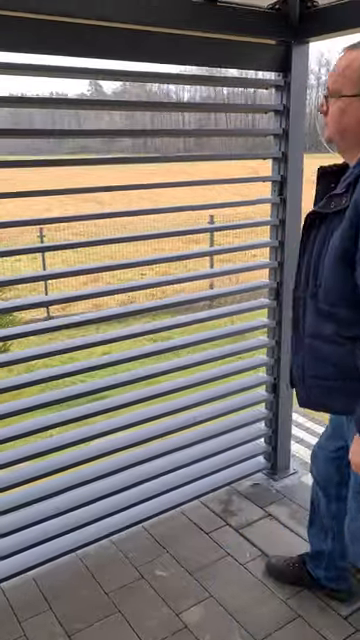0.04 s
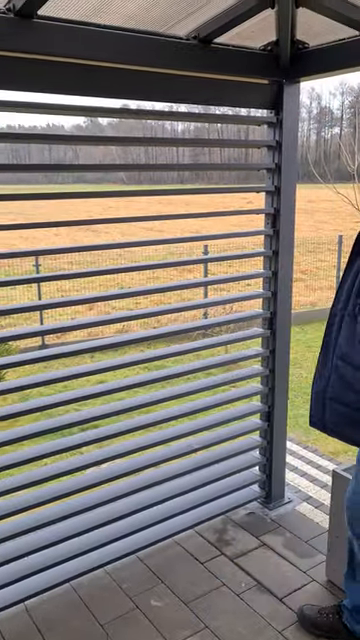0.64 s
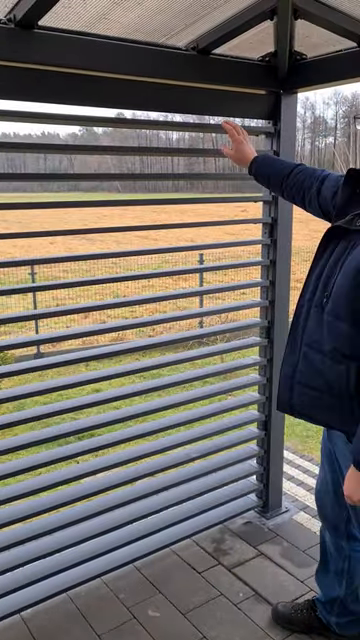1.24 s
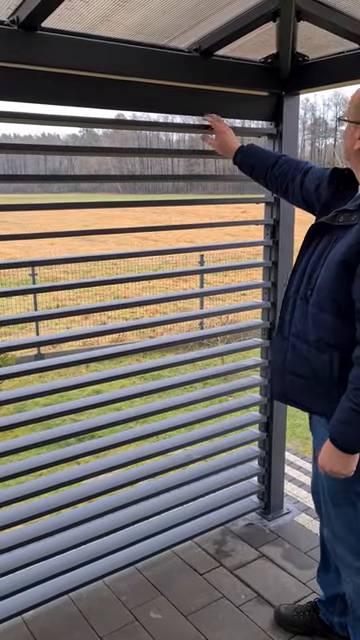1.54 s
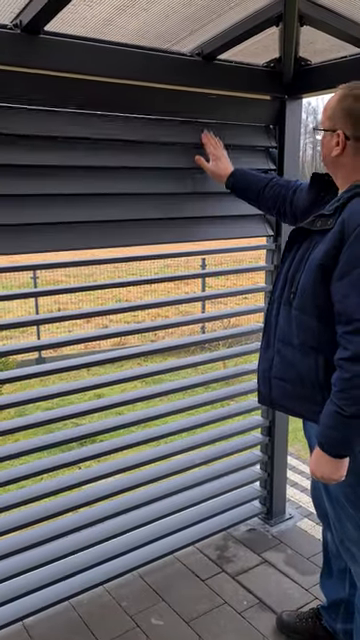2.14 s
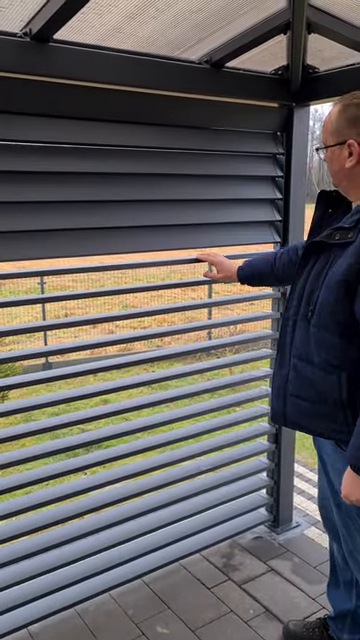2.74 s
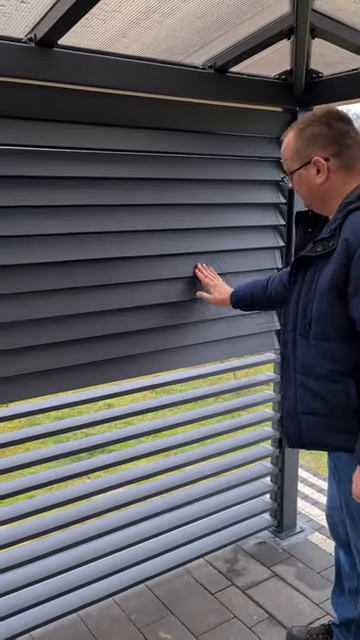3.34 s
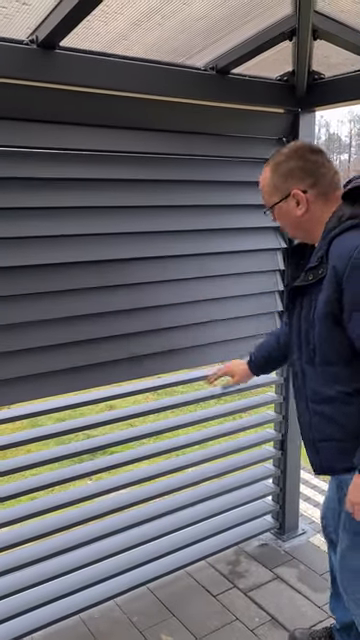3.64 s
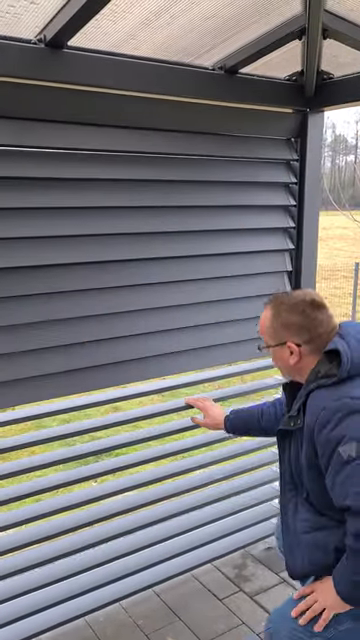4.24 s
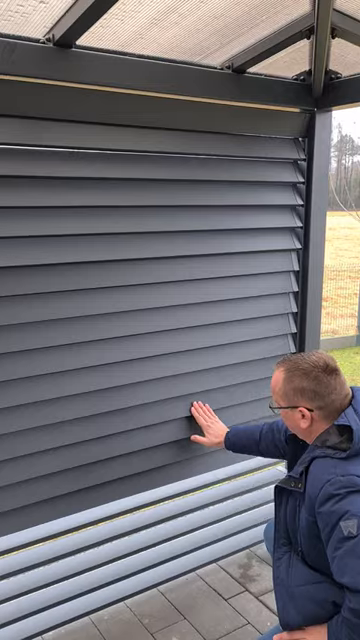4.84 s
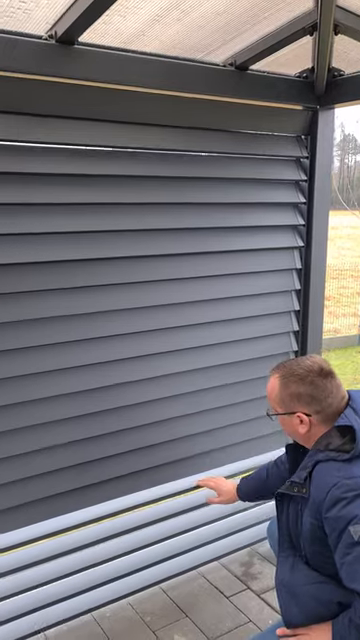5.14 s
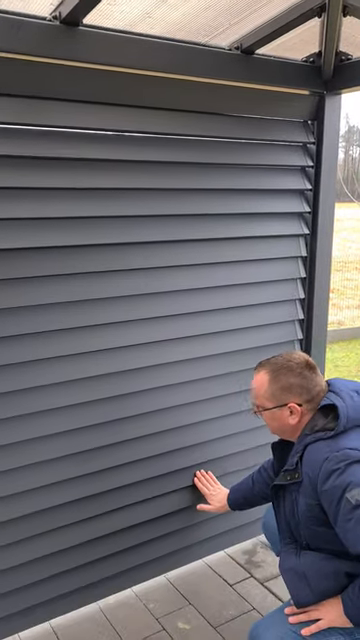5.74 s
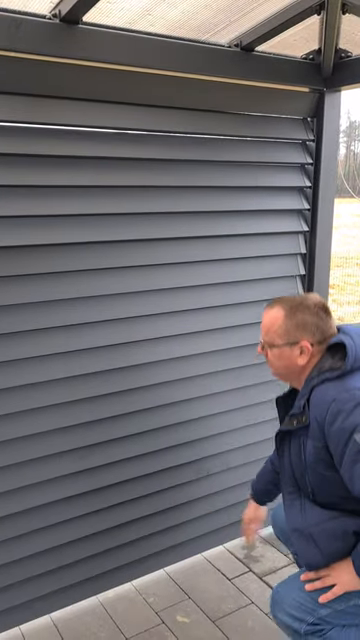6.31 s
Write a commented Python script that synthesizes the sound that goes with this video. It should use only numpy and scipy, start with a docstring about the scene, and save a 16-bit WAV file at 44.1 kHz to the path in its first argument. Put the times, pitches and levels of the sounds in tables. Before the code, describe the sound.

A metal louvre wall is tilted shut by hand, its slats knocking and clattering irregularly over a faint breeze.

```python
"""Shutting a louvre wall

On a breezy garden terrace a man in a padded jacket steps up and tilts metal slats shut, bank by bank.
The linked hollow slats land almost together, bounce, ring in damped modes and set the frame shuddering.
Around the blows come shoes on paving, the friction of sleeve and hand, and small metallic clicks."""
import sys
import numpy as np
from scipy import signal
from scipy.fft import rfft, irfft, next_fast_len
from scipy.io import wavfile
from scipy.ndimage import map_coordinates

SR = 44100
rng = np.random.default_rng(int(sys.argv[2]) if len(sys.argv) > 2 else 0)


def generate_wav(signal):
    """Clip the signal to [-1, 1] and save it as 16-bit WAV at the path in sys.argv[1]."""
    frames = np.transpose(np.atleast_2d(signal))
    scaled = np.clip(frames, -1, 1) * 32767
    pcm = np.round(scaled).astype(np.int16)
    wavfile.write(sys.argv[1], SR, pcm)


N = 289849


def amp(db):
    """Amplitude ratio of a level in decibels."""
    return 10 ** (np.asarray(db) / 20)


def unit(x):
    """Normalisation to rms 1."""
    return x / np.sqrt(np.mean(x ** 2) + 1e-20)


def along(points, hz):
    """Interpolation of (frequency, value) points on a log-frequency axis."""
    f, v = np.transpose(points)
    return np.interp(np.log(hz + 1), np.log(f + 1), v)


def fade(t, t60):
    """Exponential decay from t = 0, falling 60 dB in t60 seconds."""
    return (t >= 0) * np.exp(-np.log(1000) * np.maximum(t, 0) / t60)


def swell(s, half):
    """Gaussian envelope around second s; the half-width is its standard deviation."""
    return np.exp(-.5 * ((np.arange(N) / SR - s) / half) ** 2)


def wobble(rate):
    """Smooth random modulation, rate knots a second."""
    return map_coordinates(rng.standard_normal(int(N * rate / SR) + 4), [np.arange(N) * rate / SR])


def resonance(hz, centre, q):
    """Magnitude response of a resonator with quality factor q."""
    return 1 / np.hypot(1, q * (hz / centre - centre / (hz + 1)))


def add(out, s, x):
    """Superposition of x on out from second s."""
    part = out[:, max(round(s * SR), 0):][:, :x.shape[-1]]
    part += x[..., :part.shape[1]]


def colour(x, gain):
    """Minimum-phase filter with the given gain over frequency."""
    n = x.shape[-1]
    m = 2 * next_fast_len(n // 2 + 4096)
    cepstrum = irfft(np.log(np.maximum(gain(np.fft.rfftfreq(m, 1 / SR)), 1e-6)))
    cepstrum[1:m // 2] *= 2
    cepstrum[m // 2 + 1:] = 0
    return irfft(rfft(x, m) * np.exp(rfft(cepstrum)), m)[..., :n]


def disperse(x, bass_delay_s, corner_hz):
    """Dispersion: low frequencies travel slowly, so the bass of a blow follows its crack."""
    hz = np.fft.rfftfreq(x.shape[-1], 1 / SR)
    lag_cycles = bass_delay_s * corner_hz * np.arctan(hz / corner_hz)
    return irfft(rfft(x) * np.exp(-2j * np.pi * lag_cycles), x.shape[-1])


# Likeness of left and right: (frequency [Hz], correlation [ratio])
CORRELATION = [(120, 0.95), (300, 0.76), (600, 0.46), (1200, -0.05), (2200, 0), (4000, 0.08), (8000, 0.08)]
def noise(size):
    """Spatial coherence: white noise at two nearby points is alike only in the bass."""
    m = next_fast_len(size)
    angle = np.arccos(along(CORRELATION, np.fft.rfftfreq(m, 1 / SR))) / 2
    spectra = rfft(rng.standard_normal((2, m))) * [np.cos(angle), np.sin(angle)]
    mid, side = irfft(spectra, m)[:, :size]
    return np.array([mid + side, mid - side])


def rush(spectrum):
    """Stationary coloured noise of rms 1."""
    return unit(colour(noise(N), lambda hz: amp(along(spectrum, hz))))


def ringing(modes, t, scatter_db):
    """Modal synthesis: damped sines of random strength, the higher ones out of phase left to right."""
    out = np.zeros((2, len(t)))
    for (hz, db, t60), (size, side, phase) in zip(modes, rng.standard_normal((len(modes), 3))):
        split = np.arccos(along(CORRELATION, hz)) / 2 * np.sign(side) * np.array([[1], [-1]])
        sine = np.sin(2 * np.pi * hz * t + np.pi * phase + split)
        out += amp(db + scatter_db * size) * fade(t, t60) * sine
    return out


# Four broad bands of an impact: (centre frequency [Hz])
BANDS_HZ = [200, 800, 3200, 9000]
def voiced(x, db, balance_db, hardness):
    """Spectral tilt: sets the band levels of an attack; harder contact gives more treble, less bass."""
    target_db = db + np.array(balance_db) + hardness * np.log2(np.array(BANDS_HZ) / BANDS_HZ[1])
    attack = x[:, :SR // 25]
    power = np.mean(np.abs(rfft(attack)) ** 2, axis=0) * 2 / attack.shape[1] ** 2
    edges_hz = [100, 350, 1700, 5500, 16000]
    band_power = np.histogram(np.fft.rfftfreq(attack.shape[1], 1 / SR), edges_hz, weights=power)[0]
    gains = list(zip(BANDS_HZ, target_db - 10 * np.log10(band_power)))
    return colour(x, lambda hz: amp(along(gains, hz)))


# Spectra of the breeze and the open fields: (frequency [Hz], relative density [dB])
BREEZE_SPECTRUM = [(15, -13), (40, -1), (60, -6), (100, -11.5), (200, -38), (500, -73)]
FIELD_SPECTRUM = [(59, -32.5), (100, 5.5), (150, -0.5), (290, -3), (400, -4), (870, -8), (1540, -7.5),
                  (2470, -20), (4900, -21.5), (6400, -44.5), (8000, -37), (11000, -24), (15500, -25)]
# Gusts: (centre time [s], level [dB], half-width [s])
GUSTS = [(.2, -58, 0.14), (2.14, -50, 0.26), (2.98, -47.5, 0.12), (3.9, -60.5, 0.38), (5.496, -60, 0.26),
         (6.31, -50.5, 0.096)]
def outdoors(breeze_db=-57, field_db=-61.5):
    """Amplitude-modulated noise: a low breeze swells in gusts over the even wash of open fields."""
    strength = amp(breeze_db) + sum(amp(db) * swell(s, half) for s, db, half in GUSTS)
    breeze = strength * unit(rush(BREEZE_SPECTRUM) * amp(2.5 * wobble(9)))
    return breeze + amp(field_db + 0.25 * wobble(10)) * rush(FIELD_SPECTRUM)


# Spectrum of a sole on paving: (frequency [Hz], relative density [dB])
SOLE_SPECTRUM = [(60, -34), (115, -25), (175, -8.5), (330, -5.5), (600, 2.5), (1600, -0.5), (4000, -29.5),
                 (15000, -28)]
# Band balance of a step: (thud [dB], body [dB], scuff [dB], grit [dB])
STEP_BALANCE = [5.5, -5.5, -6, -27.5]
# Footfalls: (time [s], relative level [dB], hardness [dB/octave], rise time [s])
STEPS = [(0.053, -46, -0.5, 0.0014), (.078, -40.5, 0, 0.0023), (.156, -48, -2, 0.036),
         (0.5, -58.5, -4.8, .003), (0.549, -48, -2.5, 0.009), (1.44, -54, 0.5, 0.024), (3.798, -60, 1, .02),
         (4.232, -61, 1, .01), (4.488, -57, -1, 0.045)]
def shoes():
    """Cushioned impact: heel and sole roll onto the paving, and the roof reverberates faintly."""
    out, t = np.zeros((2, N)), np.arange(SR // 3) / SR
    for s, db, hardness, rise in STEPS:
        envelope = fade(t, .035) * (1 - fade(t, rise)) + amp(-16) * fade(t, .25)
        tread = colour(noise(len(t)) * envelope, lambda hz: amp(along(SOLE_SPECTRUM, hz)))
        step = voiced(tread, db, STEP_BALANCE, hardness)
        add(out, s, disperse(step, bass_delay_s=0.006, corner_hz=300))
    return amp(-3.5) * out


# Spectrum of rubbing cloth: (frequency [Hz], relative density [dB])
CLOTH_SPECTRUM = [(200, 12), (900, 17.5), (2500, 2), (5000, 1.5), (7000, -12.5), (9500, -3), (13000, 2),
                  (16000, -0.5)]
# Short swishes and rubs of sleeve and hand: (centre time [s], level [dB], half-width [s])
RUBS = [(0.345, -62, 0.0058), (0.547, -59, 0.022), (1.44, -57.5, 0.037), (1.617, -48.5, 0.039),
        (1.695, -66.5, 0.031), (2.903, -69, 0.013), (3.773, -70, 0.021), (4.532, -61, 0.076),
        (6.358, -53.5, 0.084)]
def jacket_and_hand(crouch_db=-67, palm_db=-57, palm_half_s=.02, palm_hz=6100):
    """Friction noise: sleeve and hand rub, the jacket crumples in a crouch, a palm slides off each bank."""
    friction = rush(CLOTH_SPECTRUM) * amp(1.4 * wobble(300))
    crumple = unit(colour(friction, lambda hz: resonance(hz, 4170, q=0.69)) * amp(2 * wobble(21.85)))
    out = amp(crouch_db) * crumple * swell(3.87, half=0.32)
    # quicker strokes are brighter
    rubs = [(s, db, half, 5100 * (0.0099 / half) ** 0.34) for s, db, half in RUBS]
    palms = [(s + delay, palm_db, palm_half_s, palm_hz) for s, *_, delay in SHUTS]
    for s, db, half, centre in rubs + palms:
        near = np.abs(np.arange(N) / SR - s) < .25
        stroke = unit(colour(friction[:, near], lambda hz: resonance(hz, centre, q=.9)))
        out[:, near] += amp(db) * stroke * swell(s, half)[near]
    return out


def contacts(t, spread, bounce_db, count=6, t60=0.025, bounce_s=.033, touch_db=-26):
    """Incoherent impacts add in power: a light touch, then each slat lands and bounces once."""
    late, size, hop = rng.random((3, count)) * (np.arange(count) > 0)
    landings = spread * (np.arange(count) + late) / count
    rebounds = landings + bounce_s * (0.46 + .5 * hop)
    strengths = amp(-3 * np.arange(count) / count - 9 * size)
    power = (amp(touch_db) * fade(t - t[0], t60)) ** 2
    for land, rebound, gain in zip(landings, rebounds, strengths):
        power += gain ** 2 * (fade(t - land, t60) ** 2 + (amp(bounce_db) * fade(t - rebound, t60)) ** 2)
    return np.sqrt(power)


# Damping of wall and roof: (frequency [Hz], decay time T60 [s])
WALL_DECAY = [(120, 0.75), (300, 0.28), (1000, 0.33), (3500, 0.32), (6000, 0.25), (14000, 0.19)]
def dense_ring(size):
    """Modal overlap: countless weak modes of wall and roof merge into noise; the treble dies first."""
    hz, t, spectra = signal.stft(noise(size), SR, nperseg=256)
    decay = fade(t, along(WALL_DECAY, hz)[:, None])
    return signal.istft(spectra * decay, SR, nperseg=256)[1][:, :size]


# Modes of each bank of hollow slats: (frequency [Hz], relative level [dB], uncapped T60 [s])
TOP_MODES = [(182, -5, 0.48), (240, 0, 0.18), (294, -2.5, 0.3), (403, -3.5, 0.16), (478, 1.5, 0.12),
             (572, -2, 0.12), (712, -6.5, 0.11), (1007, -14, 0.17), (1216, -2, 0.11), (1500, -22, 0.28),
             (1940, -27, 0.16), (3050, -26, 0.22)]
UPPER_MODES = [(130, 2, .25), (152, 7, 0.23), (260, -1, 0.27), (501, -7, .22), (622, -3, 0.17),
               (700, -7, 0.16), (848, -5, 0.15), (1070, -6, 0.11), (1170, -3, 0.1), (1380, -9, 0.13),
               (1615, -7, .14), (3310, -4.5, 0.054), (4060, -8, 0.062), (4630, -9, 0.059)]
LOWER_MODES = [(166.1, 2.5, 0.41), (264.5, 0, 0.96), (307, 3, 0.31), (414, 3, 0.13), (433, -2.5, 0.58),
               (534, 10, 0.061), (704, 1.5, 0.16), (760, -2.5, 0.28), (920, -31, 0.37), (1127, -5.5, 0.33),
               (1307, -2, 0.17), (1686, -13, 0.39)]
BOTTOM_MODES = [(152.2, -7, 0.75), (240.6, -1.5, 0.39), (371, -7.5, 0.35), (431.5, -7.5, 0.32),
                (560, 6, 0.085), (676, -2.5, 0.29), (799, -4.5, 0.17), (987, 3, 0.083), (1207, -14.5, 0.38),
                (1370, -21, 0.16), (1548, -14.5, 0.26), (1910, -19.5, 0.31), (2410, -22.5, 0.31),
                (3380, -24, 0.31), (4960, -11, 0.068), (4150, -18, 0.13)]
# Spectra of their edge contacts: (frequency [Hz], relative density [dB])
TOP_EDGE = [(71, -35.5), (120, -3.5), (261, 0.5), (540, -11), (805, -14), (1010, -18.5), (1940, -25.5),
            (2430, -35.5), (4500, -28.5), (7050, -27.5), (11500, -18), (16000, -29)]
UPPER_EDGE = [(59, -49), (100, -10), (156, -6.5), (283, -9), (328, -14.5), (621, -7), (768, -21.5),
              (891, -23), (1170, -16.5), (1950, -31), (3250, -33), (6020, -39), (10700, -41.5),
              (12700, -34), (16000, -48)]
LOWER_EDGE = [(59, -22.5), (100, 1.5), (150, -7.5), (215, -7), (277, -5.5), (736, -13.5), (872, -21.5),
              (1170, -13.5), (1520, -22), (1760, -24), (2860, -26.5), (4670, -25.5), (8110, -31.5),
              (10200, -31.5), (16000, -45)]
BOTTOM_EDGE = [(59, -49), (100, 0), (471, -6), (547, -2), (891, -6.5), (970, -9), (1250, -11),
               (1390, -13.5), (2220, -21), (2420, -22.5), (2630, -30.5), (3540, -24), (6290, -34),
               (9410, -30.5), (16000, -36)]
# Band balance of each bank, top first: (thud [dB], body [dB], clack [dB], tick [dB])
BANK_BALANCE = [(3.5, -1.5, -7, -21), (-6.5, -1, -9.5, -21.5), (-11, 0.5, -20.5, -26.5),
                (-11, 0, -8, -15.5)]
def clack(bank, db, hardness, spread, ring_db):
    """Impact excitation: edge contacts set a bank ringing; slats that ring less also bounce less."""
    modes = (TOP_MODES, UPPER_MODES, LOWER_MODES, BOTTOM_MODES)[bank]
    edge = (TOP_EDGE, UPPER_EDGE, LOWER_EDGE, BOTTOM_EDGE)[bank]
    t = np.arange(SR * 3 // 5) / SR - .003  # the first touch precedes the landing at t = 0
    build_up = 1 - fade(np.maximum(t, 0), 0.007)  # the ring takes a moment to fill the slats
    cracks = noise(len(t)) * contacts(t, spread, bounce_db=2 * ring_db - 0.5)
    tail_spectrum = [(300, -4.0), (2000, 0.5), (4000, -1.5), (9000, -6.5)]
    tail = colour(dense_ring(len(t)) * build_up, lambda hz: amp(along(tail_spectrum, hz)))
    clatter = unit(colour(cracks + amp(ring_db) * tail, lambda hz: amp(along(edge, hz))))
    damped = [(hz, level, min(t60, 1.1 * along(WALL_DECAY, hz))) for hz, level, t60 in modes]
    tone = unit(ringing(damped, t, scatter_db=1.5) * build_up)
    blow = voiced(clatter + amp(ring_db + 0.5) * tone, db, BANK_BALANCE[bank], hardness)
    return disperse(blow, bass_delay_s=0.01181, corner_hz=257)


# Held slats knocking in their play: (time [s], relative level [dB], hardness [dB/octave])
KNOCKS = [(1.491, -68.5, -6.5), (1.559, -50, 2.1), (1.583, -48.5, 3.5), (1.631, -45, 1.8),
          (3.018, -47.5, 2.8), (5.43, -42, 1), (5.475, -35, 1)]
# Banks falling shut, top first:
# (time [s], relative level [dB], landing spread [s], relative frame level [dB], palm delay [s])
SHUTS = [(2.173, -44, 0.023, -44.5, 0.25), (3.25, -21, 0.012, -40, .203), (4.8, -22.5, .012, -37, .183),
         (5.729, -21, 0.016, -36.5, .517)]
def slats():
    """Backlash and free vibration: a held bank knocks with little ring; let go, it lands and rings."""
    out, shut_times = np.zeros((2, N)), [row[0] for row in SHUTS]
    for bank, (s, db, spread, _, _) in enumerate(SHUTS):
        add(out, s, clack(bank, db, hardness=0, spread=spread, ring_db=-1.5))
    for s, db, hardness in KNOCKS:
        next_bank = np.searchsorted(shut_times, s)
        add(out, s, clack(next_bank, db, hardness, spread=0.017, ring_db=-7.5))
    return out


# Bending modes of the long slats and posts: (frequency [Hz], relative level [dB], T60 [s])
FRAME_MODES = [(44.6, -12.5, 1.4), (51.7, -7.5, 2.44), (77.2, -4, 2.06), (87.3, -8.5, 1.6),
               (108.85, -10.5, 1.6), (131.1, -1, 0.47), (161.3, 0, 0.8)]
def frame():
    """Flexural vibration: the long slats and their posts keep shuddering after a bank shuts."""
    out, t = np.zeros((2, N)), np.arange(SR * 3 // 2) / SR
    build_up = 1 - fade(t, 0.087)
    for s, _, _, db, _ in SHUTS:
        add(out, s, amp(db + 5.0) * ringing(FRAME_MODES, t, scatter_db=-3.5) * build_up)
    return out


# Small sharp metallic clicks, and a bright tick of chatter as one bank lands:
# (time [s], relative peak level [dB], centre frequency [Hz])
CLICKS = [(2.991, -58, 2930), (4.213, -53, 3560), (4.396, -41.5, 3900), (4.701, -40, 1610),
          (4.711, -41, 2660), (4.815, -22.5, 11500), (5.43, -28.5, 3440), (5.434, -41.5, 4970),
          (5.481, -25.5, 4730)]
def metal_clicks():
    """Transient resonance: a short burst excites one narrow band, and the metal pings briefly."""
    out, t = np.zeros((2, N)), np.arange(SR // 4) / SR
    envelope = fade(t, .018) + amp(-8) * fade(t, .13)
    for s, db, centre in CLICKS:
        click = colour(noise(len(t)) * envelope, lambda hz: resonance(hz, centre, q=3.5))
        ping = ringing([(centre, -16, .05)], t, scatter_db=1)
        add(out, s, amp(db) * (click / np.abs(click).max() + ping))
    return out


# Stereo balance of the impacts: (frequency [Hz], left minus right [dB])
LEVEL_DIFFERENCE = [(300, -0.5), (650, 1.2), (1100, -7), (1900, -6), (4000, -1), (8000, 0)]
def scene():
    """Superposition of all sources; a level difference places the impacts' upper midrange to the right."""
    left, right = slats() + frame() + metal_clicks() + shoes()
    left = colour(left, lambda hz: amp(along(LEVEL_DIFFERENCE, hz) / 2))
    right = colour(right, lambda hz: amp(-along(LEVEL_DIFFERENCE, hz) / 2))
    return np.array([left, right]) + jacket_and_hand() + outdoors()


def record(dry):
    """Band limiting: an ideal low-pass filter at 16 kHz."""
    m = next_fast_len(N + SR // 2)
    passband = np.fft.rfftfreq(m, 1 / SR) < 16000
    return irfft(rfft(dry, m) * passband, m)[:, :N]


dry = scene()
out = record(dry)
generate_wav(out)
```